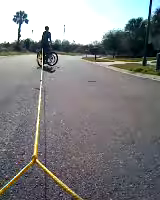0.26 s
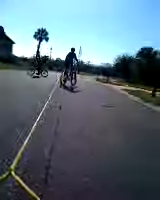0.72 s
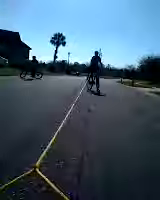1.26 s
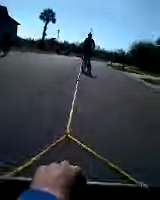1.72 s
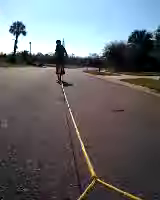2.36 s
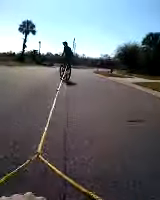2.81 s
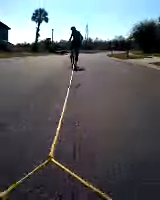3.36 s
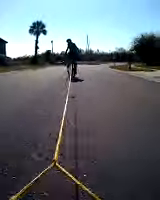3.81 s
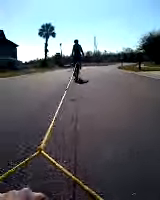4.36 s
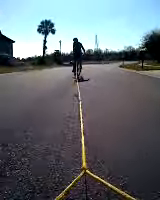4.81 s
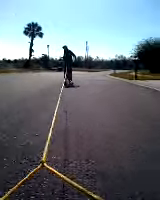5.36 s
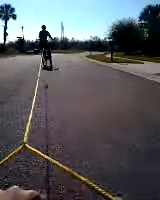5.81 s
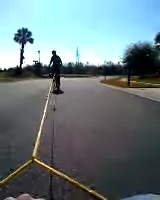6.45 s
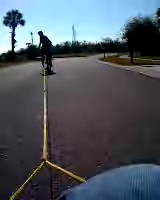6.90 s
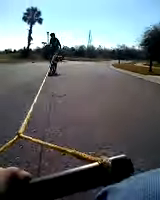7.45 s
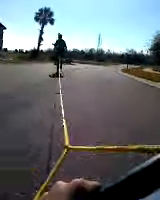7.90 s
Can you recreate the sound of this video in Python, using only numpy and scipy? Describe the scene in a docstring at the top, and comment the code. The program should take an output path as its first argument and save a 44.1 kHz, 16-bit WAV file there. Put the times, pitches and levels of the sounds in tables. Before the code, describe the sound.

Close on a small cart towed by a bicycle along an open street: hard wheels crunch over coarse asphalt, uneven and grainy at first, then faster and denser. A hollow body rumbles, the frame clatters and loose metal rings. Pebbles snap under the wheels, bumps hit harder, and dull thumps join late. The microphone rides on the cart, so the peaks sound slightly overloaded.

```python
"""Towed cart on coarse asphalt

A small cart on hard wheels is towed by a bicycle and gathers speed, the microphone riding on it.
Random stone hits, noise and bumps drive filters: the hollow body rumbles, the frame clatters, grit crunches.
Stone hits drive resonances, so bar, frame and fittings ring; the deck hums to a stone stream of its own.
Pebbles and grains are filtered clicks, soft thumps are low-passed clicks, and wind is low noise that
flutters faintly below."""
import sys
import numpy as np
from scipy import signal
from scipy.fft import rfft, irfft
from scipy.io import wavfile
from scipy.ndimage import uniform_filter1d, minimum_filter1d

SR = 44100
rng = np.random.default_rng(int(sys.argv[2]) if len(sys.argv) > 2 else 0)


def digitize_waveform(pressure):
    """Quantize a signal to 16-bit integers and store it at the path in sys.argv[1].

    Rows of a 2-D input are taken as channels; values are limited to [-1, 1].
    """
    field = np.atleast_2d(pressure).T
    bounded = np.clip(field, -1, 1)
    quanta = np.round(bounded * 32767).astype(np.int16)
    wavfile.write(sys.argv[1], SR, quanta)


N = 359415


def from_db(db):
    """Decibels to gain."""
    return 10 ** (np.asarray(db) / 20)


def rms_one(x):
    """Scale to an rms of 1."""
    return x / np.sqrt(np.mean(x ** 2) + 1e-20)


def steady(x, span_s):
    """Hold the running rms at 1, leaving faster flutter as it is."""
    size = max(int(span_s * SR), 64)
    power = uniform_filter1d(uniform_filter1d(x ** 2, size), size)
    return x / np.sqrt(np.abs(power) + 1e-14)


def in_time(rows):
    """Columns of a curve table, sample by sample."""
    s, *columns = np.transpose(rows)
    return [np.interp(np.arange(N) / SR, s, c) for c in columns]


def drift(rate_hz):
    """Smooth chance with a spread of 1 that changes about rate_hz times a second."""
    step = 20   # samples per point of the slow noise
    r = np.exp(-2 * step * np.pi * rate_hz / SR)
    noise = rng.standard_normal(N // step + 2002)
    slow = signal.lfilter([1], [1, -2 * r, r * r], noise)[2000:]
    return np.interp(np.arange(N) / step, np.arange(len(slow)), rms_one(slow))


def respond(force, spectrum):
    """Causal (minimum-phase) response with the given spectrum; white noise keeps its rms."""
    size = 4096
    hz, db = np.transpose(spectrum)
    # both ends fall away
    hz = [hz[0] / 2, *hz, hz[-1] * 2]
    db = [db[0] - 17.5, *db, db[-1] - 8.0]
    bins_hz = np.arange(size // 2 + 1) * SR / size
    gain = rms_one(from_db(np.interp(np.log(bins_hz + 1), np.log(hz), db)))
    cepstrum = irfft(np.log(gain))[:size // 2]
    cepstrum[1:] *= 2
    impulse = irfft(np.exp(rfft(cepstrum, size)))
    return signal.oaconvolve(force, impulse)[:N]


def resonate(force, modes):
    """Parallel resonances driven by one force; rms 1."""
    out = np.zeros(N)
    for hz, width_hz, db in modes:
        r = np.exp(-np.pi * width_hz / SR)
        b = np.array([1, 0, -1]) * (1 - r * r) / 2
        a = [1, -2 * r * np.cos(2 * np.pi * hz / SR), r * r]
        out += from_db(db) * signal.lfilter(b, a, signal.lfilter(b, a, force))
    return rms_one(out)


def blows(times_s, levels_db):
    """One click for each time and level."""
    clicks = np.zeros(N)
    clicks[np.clip(np.round(times_s * SR).astype(int), 0, N - 1)] = from_db(levels_db)
    return clicks


def snaps(rows, spectrum, level_db):
    """One sharp, wide-band click for each row, its response scaled to a unit peak."""
    times_s, peaks_db = np.transpose(rows)
    height = np.max(np.abs(respond(blows(np.zeros(1), 0), spectrum)))
    return respond(blows(times_s, peaks_db + level_db), spectrum) / height


def stones(per_s, size_spread_db):
    """Stones meet the wheels at random: many small ones, a few large."""
    sizes = from_db(size_spread_db * np.minimum(rng.exponential(1, N), 4)) * rng.choice([-1, 1], N)
    return steady(sizes * (rng.random(N) < per_s / SR), span_s=0.15)


HOP_DEPTH, HOP_EASING = 1.09, 0.068   # load rms at 1 m/s; power of speed it falls with
WHEEL_ROUND_M = 0.41


def wheel_load(speed):
    """Bouncing load on the wheels: fast hopping, slower rocking, and a beat on each turn."""
    turns = np.cumsum(speed) / SR / WHEEL_ROUND_M
    load = rms_one(drift(86) + 0.47 * drift(36) + 0.66 * np.sin(2 * np.pi * turns))
    return load * HOP_DEPTH / speed ** HOP_EASING


# rougher road (+) or light-running wheels (-): middle t/s, length/s, body, frame, wheel change/dB
STRETCHES = [(0.06, 0.015, 0, -5, -6), (0.16, 0.018, -1, -5, -8), (0.255, 0.064, -0.5, -5, -1),
             (0.447, 0.021, 2, -5, -11), (0.604, 0.048, -0.5, 0, -4), (0.68, 0.053, 1, 3, 2.5),
             (0.756, 0.042, 3.5, 5, 3), (0.847, .07, 0, -2, -1), (0.879, 0.014, -2, -2, -2),
             (1.014, 0.035, 2.5, 3, 3), (1.123, 0.053, -4.5, -2.5, -4.5), (1.247, 0.095, 2, 1, 1),
             (1.354, 0.045, -1, -0.5, 2.5), (1.415, 0.053, -1, -2.5, -7), (1.485, 0.047, -3.5, -3, 3),
             (1.591, 0.018, 2, 0.5, 5), (1.731, 0.04, 1, 4, 3.5), (1.757, 0.025, -7, -4.5, -1.5),
             (1.915, 0.059, 2, 1.5, 2), (2.029, 0.016, -3, -7, -1), (2.074, 0.097, 0, 2, 3.5),
             (2.27, 0.019, -9, 1, -5), (2.309, 0.019, -4, 4, -12), (2.39, 0.03, -6, 0, 3),
             (2.586, 0.062, -1, -2.5, -3.5), (2.805, 0.058, -3, -0.5, -4), (2.978, 0.016, 4.5, 1, 6),
             (3.001, 0.018, -15, -3, 1), (3.048, 0.061, 2, 1, 0.5), (3.193, 0.069, -0.5, -0.5, -1),
             (3.28, 0.033, -2, -3, 1), (3.496, 0.033, -5, -1, 1.5), (3.753, 0.11, 0, 2, 1.5),
             (3.815, 0.014, 1.5, -3, -9), (3.912, 0.021, -2.5, -3.5, -3.5), (4.07, 0.055, -0.5, 2.5, -2.5),
             (4.215, 0.035, -2, -4.5, -4), (4.246, 0.028, 3.5, 1, 2.5), (4.343, 0.022, -8, -1, -0.5),
             (4.432, 0.038, -0.5, -2.5, -2), (4.577, 0.07, 0.5, -2, 1), (4.733, 0.046, -0.5, -1, -6.5),
             (4.808, 0.015, -2, -2, -3.5), (4.87, .05, 1, -1.5, -3), (5.203, 0.065, -2.5, -2.5, -0.5),
             (5.255, 0.022, 3.5, -0.5, -3.5), (5.405, 0.047, -2, -4.5, -4), (5.612, 0.14, 2.5, 2.5, 1),
             (5.75, 0.047, 2.5, -3.5, -3), (5.908, 0.024, -6, -6, -4), (5.933, 0.038, 3.5, -1, 4),
             (6.042, 0.042, -1, -3, -1), (6.07, 0.041, 0.5, 4, 3), (6.262, 0.036, -1, 2, 4),
             (6.33, 0.028, -1.5, -4, -4.5), (6.455, 0.034, -4, 1, 2.5), (6.476, 0.018, 0, 3, -10),
             (6.626, 0.048, -1.5, -1, -3), (6.707, 0.02, -0.5, 1, -3.5), (6.945, 0.023, -0.5, -8, -5),
             (7.043, 0.021, 3, 5, 0), (7.539, 0.061, 0, 2, 3.5), (7.654, 0.059, -1.5, -3.5, -1),
             (7.723, 0.031, -6.5, 1, -2.5), (7.877, .035, 4.5, 1, -1), (7.898, 0.027, -4, -2.5, -2)]
EDGE_S = 0.0077   # time a wheel takes to enter or leave a stretch


def stretches():
    """Level change of body, frame and wheel in dB as the cart crosses each stretch."""
    db = np.zeros((3, N))
    for middle_s, length_s, *parts_db in STRETCHES:
        start = int((middle_s - length_s / 2) * SR)
        end = int((middle_s + length_s / 2) * SR)
        db[:, start:end] += np.array(parts_db)[:, None]
    return uniform_filter1d(db, max(int(EDGE_S * SR), 1), axis=1)


FLIGHT_S, FLIGHT_EDGE_S = 0.012, 0.0044   # time in the air, time to unload


def flight(times_s):
    """Share of weight, 0 to 1, off a wheel that a pebble lifts just before it lands."""
    airborne = np.zeros(N)
    for s in times_s:
        airborne[int(max(s - FLIGHT_S, 0) * SR):int(s * SR)] = 1
    return uniform_filter1d(airborne, max(int(FLIGHT_EDGE_S * SR), 1))


# bumps per s, level/dB over the rolling at 1 m/s, random extra up to this/dB
SMALL_BUMPS_PER_S, SMALL_BUMP_DB, SMALL_BUMP_SPREAD_DB = 14, 2, 2


def lesser_bumps(speed):
    """Lesser bumps come at random and sink into the rolling with speed."""
    met = rng.random(N) < SMALL_BUMPS_PER_S / SR
    size = from_db(SMALL_BUMP_DB + SMALL_BUMP_SPREAD_DB * rng.random(N))
    return met * size / np.sqrt(speed)


# hardest bumps, relative levels: t/s, wheel level/dB, body level/dB, frame level/dB
BUMPS = [(0.0774, -17, -16, -29), (0.1059, -11.5, -14, -17), (0.14, -22, -26, -30),
         (0.1714, -15, -9.5, -27), (0.199, -22, -27, -22), (0.2202, -19, -15, -20), (0.3005, -13, -30, -31),
         (0.3208, -20, -25, -28), (0.393, -15, -11, -14), (0.4274, -18, -27, -18), (0.474, -27, -18, -18),
         (0.5656, -14.5, -24, -24), (0.7388, -13.5, -26, -17.5), (0.789, -19, -21, -28),
         (0.911, -18, -18, -27), (0.947, -21, -22, -22), (1.0974, -35, -28, -22), (1.128, -19, -28, -21),
         (1.3636, -27, -22, -25), (1.5439, -14, -11, -26), (1.6133, -18, -30, -17), (1.6915, -28, -7, -10),
         (1.785, -20, -6, -18), (1.8486, -39, -11, -13.5), (2.1088, -11.5, -17, -16), (2.139, -26, -9, -33),
         (2.2333, -17, -16, -21), (2.341, -19, -11, -16), (2.4385, -12.5, -22, -17), (2.473, -22, -16, -22),
         (2.627, -13.5, -18, -15.5), (2.783, -31, -15, -24), (2.8953, -13, -20, -15),
         (3.272, -11, -5.5, -19), (3.297, -29, -7, -24), (3.6063, -22, -23, -8.5), (3.793, -23, -25, -9.5),
         (3.835, -16, -10, -8), (4.048, -17, -5, -20), (4.091, -16, -7, -10), (4.242, -11, -14, -16),
         (4.271, -21, -15, -9.5), (4.3792, -17, -5, -9), (4.499, -17, -13, -15), (4.631, -11.5, -19, -13),
         (4.727, -21, -4, -24), (4.829, -24, -9, -14), (4.9117, -35, -6, -10), (5.072, -12, -6, -10),
         (5.26, -25, -9, -12), (5.321, -23.5, 1, -6), (5.4765, -29, -21, -5), (5.546, -10, -5, -9),
         (5.831, -28, -20, -12), (5.881, -13, -7, -24), (5.925, -21, -8, -7), (5.993, -11, -8, -21),
         (6.169, -11, -0.5, -13), (6.278, -22, -16, -14), (6.42, -12, -3, -6), (6.4842, -8.5, -2, -10),
         (6.7572, -13, -7, -4), (6.796, -11, -13, -17), (6.984, -17, -11, -6), (7.117, -27, -0.5, -12),
         (7.294, -15, -4, -15), (7.5658, -12, -18, 4), (7.9885, -10, -4, -3)]


def jolts(hard_db, rolling_db, small_bumps, settle_s, bounce_db):
    """A bump throws the wheels up; they bounce unevenly for a few milliseconds as they settle."""
    kicks = blows(np.array(BUMPS)[:, 0], hard_db) + small_bumps * from_db(rolling_db)
    envelope = signal.lfilter([1], [1, -np.exp(-1 / (settle_s * SR))], kicks + 1e-18)
    return envelope * from_db(bounce_db * drift(280))


def shaken(spectrum, level_db, road, load, jolt, shared, load_db, bump_db):
    """One part of the cart, driven by stones and fine road texture under the wheel load, and by bumps."""
    texture = rng.standard_normal(N)
    force = (np.sqrt(shared) * road + np.sqrt(1 - shared) * texture) * from_db(load_db * load)
    rolling = steady(respond(force, spectrum), span_s=0.056)
    knocks = respond(jolt * rng.choice([-1, 1], N), spectrum)
    return from_db(level_db) * rolling + from_db(bump_db) * knocks


# body response: f/Hz, level/dB
BODY = [(35, -71), (60, -58.5), (100, -43.5), (150, -25.5), (200, -15.5), (250, -6.5), (290, -1.5),
        (350, 1), (415, 0.5), (470, -5.5), (540, -9.5), (640, -23.5), (900, -45)]


def body_rumble(level_db, road, load, jolt):
    """The hollow body answers the stones with low, broad resonance."""
    sound = shaken(BODY, level_db, road, load, jolt, shared=0.58, load_db=-0.5, bump_db=-2.5)
    return from_db(-0.24) * sound


# frame response: f/Hz, level/dB
FRAME = [(350, -31), (500, -16.5), (600, -7), (720, -6), (800, -4), (870, -1), (950, -1), (1060, -6),
         (1200, -9.5), (1350, -16.5), (1550, -29.5), (2200, -47.5)]


def frame_clatter(level_db, road, load, jolt):
    """The frame answers the stones in the middle range."""
    sound = shaken(FRAME, level_db, road, load, jolt, shared=0.42, load_db=0.7, bump_db=-1.5)
    return from_db(-0.3) * sound


# wheel response: f/Hz, level/dB
WHEEL = [(900, -31), (1250, 1), (1450, 4.5), (1600, 2), (1680, 4), (1780, 2.5), (2030, -1.5), (2200, -4),
         (2380, -2.5), (2650, -7.5), (2830, -10), (2980, -13), (3550, -21.5), (4400, -42.5)]


def wheel_crunch(level_db, road, load, jolt):
    """Hard wheels crunch on the stones, strongly following the load."""
    sound = shaken(WHEEL, level_db, road, load, jolt, shared=0.48, load_db=3.5, bump_db=2.04)
    return from_db(-2.5) * sound


# grit response: f/Hz, level/dB
GRIT = [(3000, -29), (4000, 6), (4500, -1.5), (5000, 2), (5600, 6), (6100, -1), (6500, 2), (6900, -2.5),
        (7090, 3.5), (7280, -12), (7440, -16), (7600, 1), (7800, -13.5)]


def grit_sizzle(level_db, road, load, jolt):
    """High sizzle of grit, following the wheel crunch."""
    sound = shaken(GRIT, level_db, road, load, jolt, shared=0.77, load_db=3.0, bump_db=1.5)
    return from_db(-22) * sound


# frame modes: f/Hz, width/Hz, level/dB
FRAME_RING = [(873.6, 72, -3.5), (937.6, 78, 1)]
RING_DB, RING_DB_PER_M_PER_S = -15, 2.5   # relative to the clatter: at 0 m/s, rise with speed


def frame_ring(clatter_db, road, load, speed):
    """Stones excite two frame modes, which sing more with speed."""
    tone = steady(resonate(road * from_db(1.1 * load), FRAME_RING), span_s=0.083)
    return from_db(clatter_db + RING_DB + RING_DB_PER_M_PER_S * speed) * tone


# tow bar modes: f/Hz, width/Hz, level/dB
BAR_MODES = [(1880, 170, -1.5), (1990, 140, -2.5), (6040, 300, -23.5)]
# bar rings until the pull eases, relative to the crunch: t/s, level/dB
BAR_LEVEL = [(0, -16), (0.3, -3.5), (0.8, -8.5), (1.3, -3), (1.75, -4.5), (2.0, -24)]


def tow_bar(crunch_db, road):
    """Stones excite the modes of the tow bar."""
    bar_db, = in_time(BAR_LEVEL)
    return from_db(crunch_db + bar_db) * resonate(road, BAR_MODES)


# loose metal modes: f/Hz, width/Hz, level/dB
FITTING_MODES = [(1662, 110, -4), (1860, 76, 2.5), (6125, 95, -20.5), (7040, 190, -24)]
# fittings relative to the crunch: t/s, level/dB
FITTING_LEVEL = [(0, -27.5), (2.0, -14.5), (4.7, -10.5), (5.4, -7.5), (6.5, -8.5), (6.8, -4.5), (7.15, -7),
                 (7.6, -8), (8.15, -11.5)]


def loose_fittings(crunch_db, road, load):
    """Stones excite the modes of loose metal fittings."""
    fittings_db, = in_time(FITTING_LEVEL)
    tone = steady(resonate(road * from_db(0.64 * load), FITTING_MODES), span_s=0.055)
    return from_db(crunch_db + fittings_db) * tone


# grain click: f/Hz, level/dB
GRAIN = [(500, -10), (950, -1), (1400, 3), (2400, -1), (3300, -16.5), (4800, -27.5), (7500, -30.5)]
# base peak over the crunch; range of sizes at 1 m/s
GRAINS_PER_M, GRAIN_DB, GRAIN_SPREAD_DB = 14, 3.5, 7


def grains(speed, crunch_db):
    """Loose grains crack at uneven moments, more often with speed but standing out less."""
    met = np.flatnonzero(rng.random(N) < GRAINS_PER_M * speed / SR)
    peaks_db = crunch_db + GRAIN_SPREAD_DB * rng.random(N) / np.sqrt(speed)
    return snaps(np.column_stack([met / SR, peaks_db[met]]), GRAIN, level_db=GRAIN_DB)


# deck modes: f/Hz, width/Hz, level/dB
DECK = [(416.2, 77, 3), (925, 120, -8)]
# level relative to the body, speed it needs, loss below that speed
DECK_DB, DECK_FROM_M_PER_S, DECK_DB_PER_M_PER_S = -5, 2.52, 23


def deck_hum(rumble_db, per_s, load, speed):
    """A stone stream of its own excites the deck modes; the hum is full once the cart is under way."""
    deck_db = DECK_DB - DECK_DB_PER_M_PER_S * np.maximum(DECK_FROM_M_PER_S - speed, 0)
    force = stones(per_s, size_spread_db=4.0) * from_db(2.0 * load)
    return from_db(rumble_db + deck_db) * steady(resonate(force, DECK), span_s=0.036)


# the tow: t/s, speed/(m/s)
SPEED = [(0, 0.96), (1.4, 1.46), (1.7, 2.21), (4.2, 3.2), (8.15, 4.53)]
# how hard the road shakes each part: t/s, body level/dB, frame level/dB, wheel level/dB
ROLL = [(0.0, -25.5, -29, -36), (0.05, -39, -38.5, -41.5), (0.1, -33.5, -27.5, -33.5),
        (0.3, -28.5, -29.5, -34.5), (0.75, -23.5, -27, -37), (0.85, -26, -31.5, -40),
        (1.49, -24.5, -29.5, -37), (1.56, -21, -26.5, -33.5), (2.15, -20.5, -25, -33.5),
        (2.3, -23, -29.5, -34.5), (2.9, -19, -24.5, -32), (3.15, -21.5, -25, -33.5),
        (3.6, -19.5, -23.5, -28), (4.65, -18, -21.5, -28), (4.82, -21, -24.5, -32.5),
        (5.15, -18.5, -20, -27), (5.58, -19, -21.5, -26.5), (5.8, -20.5, -22, -28.5),
        (6.15, -17, -19.5, -26.5), (7.2, -17.5, -19, -27), (7.55, -16.5, -17, -26.0), (8.15, -17, -19, -25)]
# pebbles snapping under a wheel, relative: t/s, level/dB
PEBBLES = [(0.1056, -15.5), (0.171, -15), (0.392, -14), (0.565, -13), (0.741, -11), (0.865, -21),
           (0.9121, -13), (0.948, -15), (1.099, -14), (1.5437, -13), (1.6133, -7.5), (1.849, -21),
           (2.035, -11), (2.234, -15), (2.621, -13), (2.895, -21), (2.9783, -15), (3.271, -4.5),
           (4.2433, -12), (4.818, -7), (4.913, -15), (5.0613, -15), (5.3232, -16), (5.478, -7),
           (5.502, -14), (5.717, -3), (5.927, -15), (6.4866, 0), (6.758, -13), (6.797, 0), (6.985, -9)]
STONES_PER_M, SLOW_SPREAD_DB = 620, 2   # added size spread at 1 m/s: stones stand out when slow
PATCHES_PER_S, PATCHY_DB = 5.6, 0.47   # lesser patches; depth at 1 m/s, evening out with speed
FLIGHT_DB = [-1, -1, -1.5]   # body, frame, wheel rolling while a wheel is in the air
WHEEL_CREST_DB = 11   # peak of a wheel's knock over its mean level


def cart():
    """Body, frame, wheels, grit, deck and metal, all following one speed and wheel load."""
    speed, = in_time(SPEED)
    patches_db = PATCHY_DB * drift(PATCHES_PER_S) / np.sqrt(speed)
    flight_db = np.outer(FLIGHT_DB, flight(np.array(PEBBLES)[:, 0]))
    body_db, frame_db, wheel_db = in_time(ROLL) + stretches() + patches_db + flight_db
    load = wheel_load(speed)
    per_s = STONES_PER_M * speed
    front = stones(per_s, size_spread_db=2.5 + SLOW_SPREAD_DB / speed ** 2)
    rear = stones(per_s, size_spread_db=1.5)

    small = lesser_bumps(speed)
    _, wheel_hit_db, body_hit_db, frame_hit_db = np.transpose(BUMPS)
    body_jolt = jolts(body_hit_db, body_db, small, settle_s=0.0034, bounce_db=-1.0)
    frame_jolt = jolts(frame_hit_db, frame_db, small, settle_s=0.0047, bounce_db=2.5)
    wheel_jolt = jolts(wheel_hit_db - WHEEL_CREST_DB, wheel_db, small, settle_s=0.011, bounce_db=0.0)

    sound = body_rumble(body_db, rear, load, body_jolt)
    sound += frame_clatter(frame_db, front, load, frame_jolt)
    sound += wheel_crunch(wheel_db, front, load, wheel_jolt)
    sound += grit_sizzle(wheel_db, front, load, wheel_jolt)
    sound += frame_ring(frame_db, rear, load, speed)
    sound += tow_bar(wheel_db, front)
    sound += loose_fittings(wheel_db, rear, load)
    sound += grains(speed, wheel_db)
    sound += deck_hum(body_db, per_s, load, speed)
    return sound


# air on the microphone: f/Hz, level/dB
WIND = [(25, -18.5), (55, -14), (90, 5.5), (140, 3), (300, -25.5)]


def wind(level_db, gust_db):
    """Lumpy low noise of the air passing the microphone."""
    return from_db(level_db + gust_db * drift(10)) * respond(rng.standard_normal(N), WIND)


# pebble snap: f/Hz, level/dB
SNAP = [(400, -14), (900, 18.5), (1400, -4), (2200, -10.5), (3200, -24.5), (4800, -33), (7500, -43.5)]


def pebbles(level_db):
    """A pebble snapping under a wheel is one sharp filtered click."""
    return snaps(PEBBLES, SNAP, level_db)


# soft low thumps, relative: t/s, level/dB
THUMPS = [(4.243, -59), (4.382, -56), (5.326, -35.5), (5.482, -31), (5.70, -55), (6.012, -31.5),
          (6.173, -34), (6.255, -33), (6.31, -35.5), (6.419, -32), (6.483, -27), (6.683, -40.5),
          (6.768, -33), (6.85, -32.5), (6.987, -30), (7.045, -48), (7.121, -32), (7.222, -52), (7.295, -31),
          (7.337, -31), (7.508, -29), (7.575, -39), (7.782, -54), (7.871, -38), (7.965, -41), (7.99, -38)]


def thumps(level_db, corner_hz):
    """Clicks through a low-pass become short, dull pulses."""
    times_s, peaks_db = np.transpose(THUMPS)
    dull = signal.butter(2, corner_hz, fs=SR, output="sos")
    clicks = blows(times_s, peaks_db + level_db) + 1e-18
    return signal.sosfilt(dull, clicks) * SR / (np.pi * corner_hz)


def scene():
    """The cart, the wind, the pebbles and the thumps, in mono."""
    sound = cart() + wind(level_db=-68.5, gust_db=-2.5)
    sound += pebbles(level_db=-2.5) + thumps(level_db=10.0, corner_hz=160)
    return sound[None]


LIMIT_S, CEILING = 0.0044, 0.73   # span of each duck under a peak, peak height it allows
KNEE, SQUASH = 0.56, 0.13   # height above which peaks are flattened, share of the excess lost


def limit(x):
    """A fast limiter ducks around each peak, then overload flattens what stands above the knee."""
    size = max(int(LIMIT_S * SR), 2)
    gain = minimum_filter1d(CEILING / np.maximum(np.abs(x), CEILING), size)
    x = x * uniform_filter1d(gain, size)
    return x - SQUASH * (x - np.clip(x, -KNEE, KNEE))


# faint crackle, relative: t/s, level/dB
CRACKLE = [(4.2423, -32), (4.373, -44), (4.727, -46), (5.3263, -31), (5.4805, -35), (5.5019, -38),
           (5.5498, -40), (5.7169, -45), (5.9384, -40), (5.9913, -40), (6.1375, -41), (6.1569, -31),
           (6.3121, -39), (6.4168, -33), (6.4857, -28), (6.6109, -35), (6.767, -35), (6.8499, -31),
           (6.985, -29), (7.1053, -38), (7.12, -31), (7.2948, -33), (7.3372, -42), (7.4056, -33),
           (7.5647, -36), (7.5832, -31), (7.6346, -31), (7.687, -32), (7.7817, -34), (7.8426, -37),
           (7.8586, -40), (7.9723, -42), (8.0317, -33)]
# crackle click: f/Hz, level/dB
TICK = [(1500, 0.5), (3000, 5.5), (4100, -2.5), (7500, -14.5)]
NOTCH_HZ, NOTCH_WIDTH_HZ, CUTOFF_HZ = 4028, 750, 7700


def record(dry):
    """A small recorder notches a narrow band, limits the peaks, adds crackle and cuts the top."""
    band_hz = [NOTCH_HZ - NOTCH_WIDTH_HZ / 2, NOTCH_HZ + NOTCH_WIDTH_HZ / 2]
    notch = signal.butter(3, band_hz, "bandstop", fs=SR, output="sos")
    x = limit(signal.sosfilt(notch, dry))
    cut = signal.ellip(12, .2, 80, CUTOFF_HZ, fs=SR, output="sos")
    return signal.sosfilt(cut, x + snaps(CRACKLE, TICK, level_db=6.0))


dry = scene()
out = record(dry)
digitize_waveform(out)
```